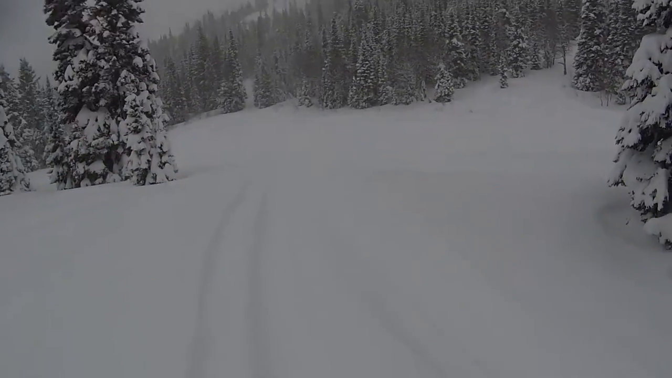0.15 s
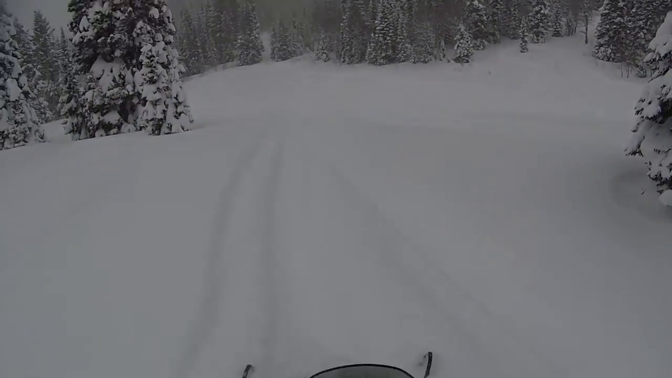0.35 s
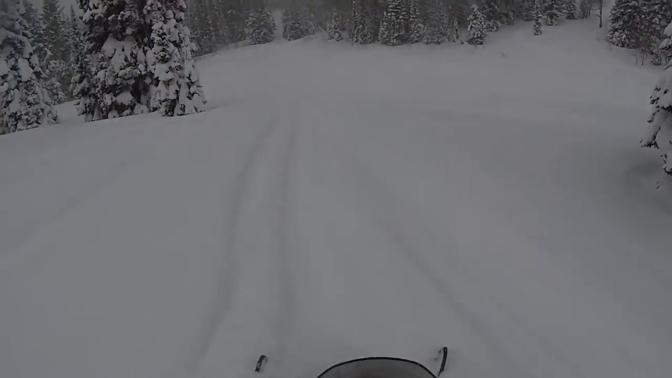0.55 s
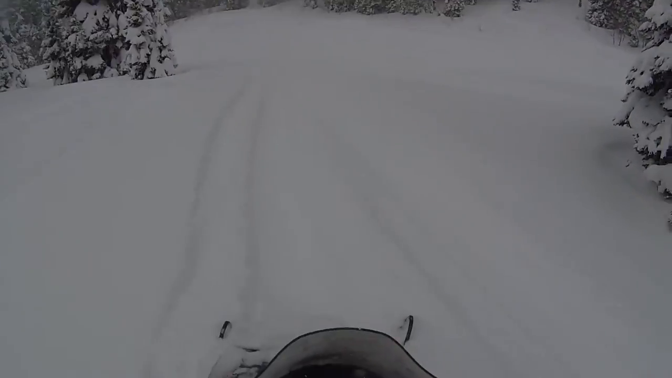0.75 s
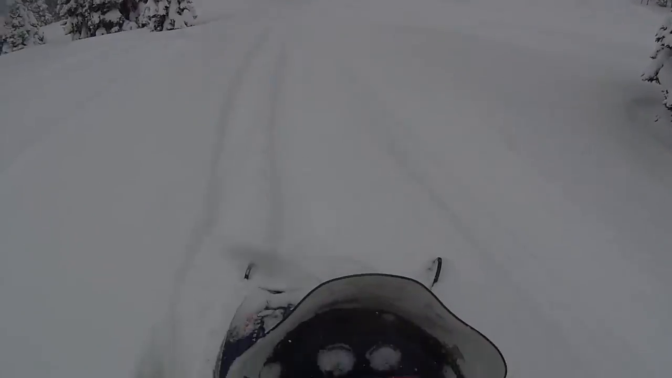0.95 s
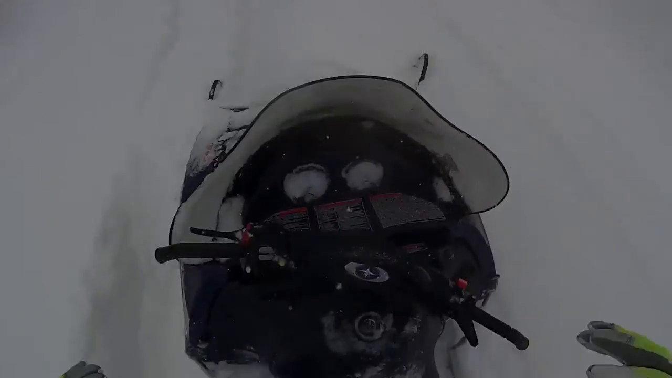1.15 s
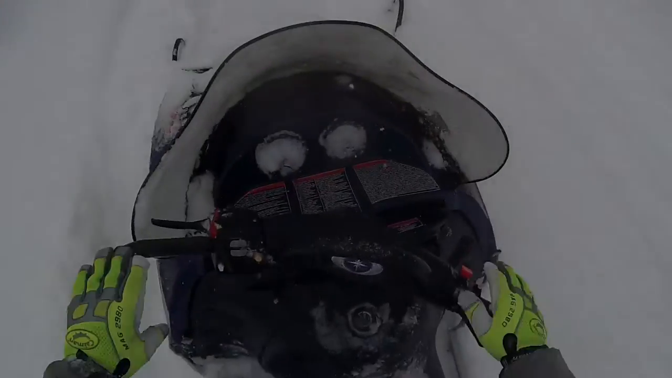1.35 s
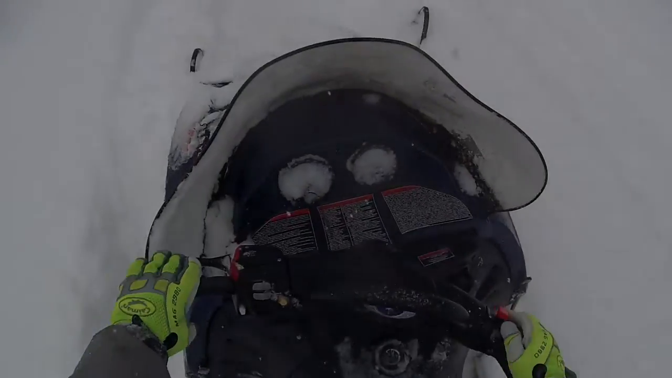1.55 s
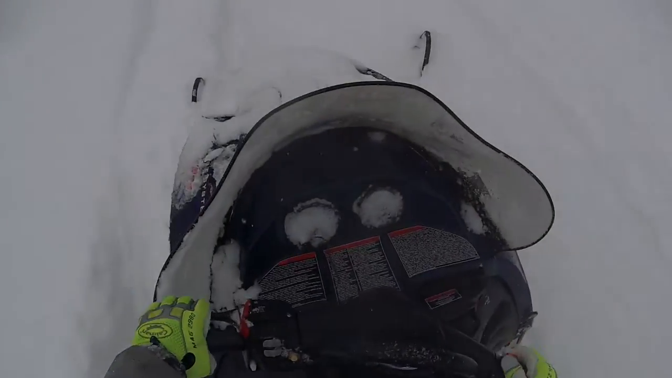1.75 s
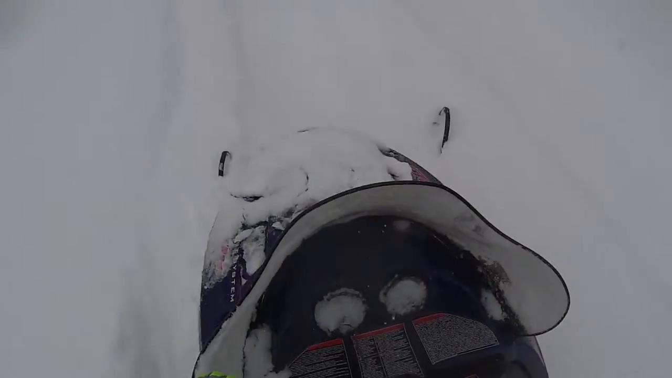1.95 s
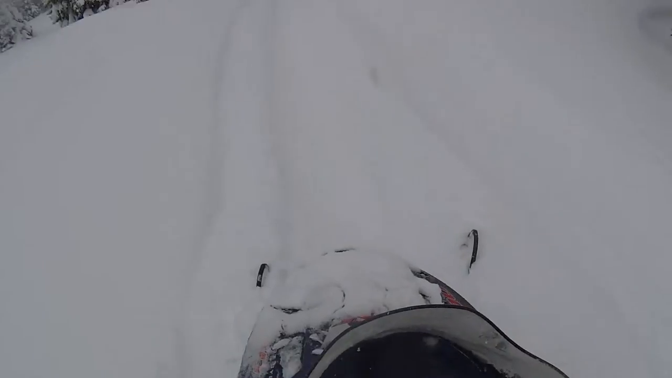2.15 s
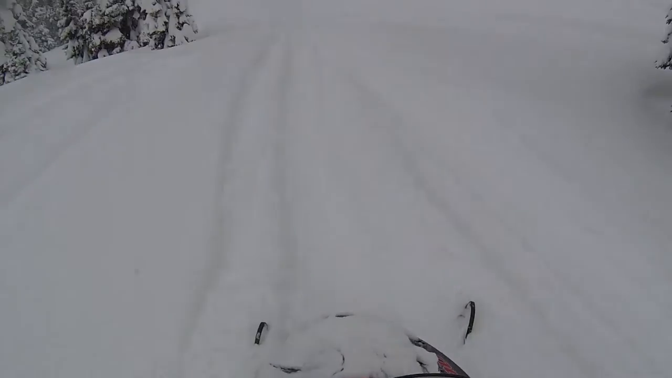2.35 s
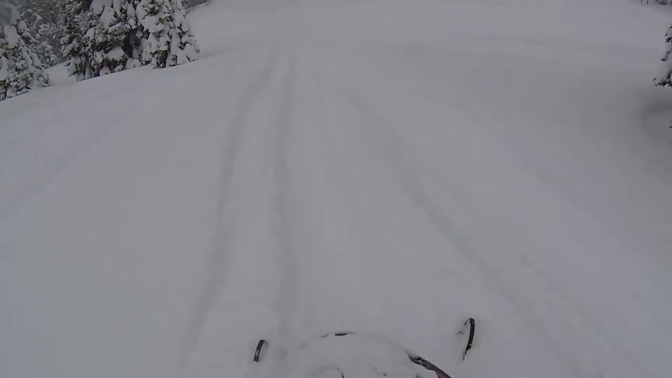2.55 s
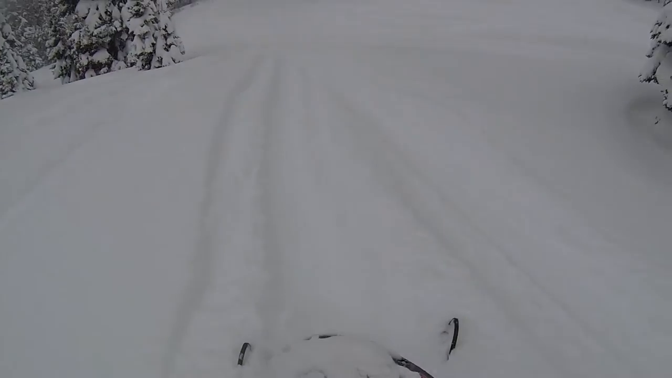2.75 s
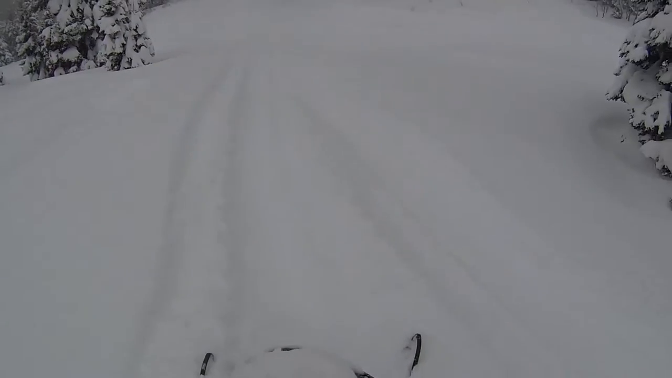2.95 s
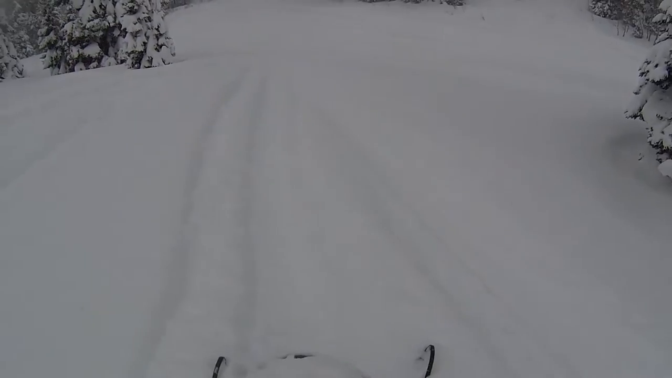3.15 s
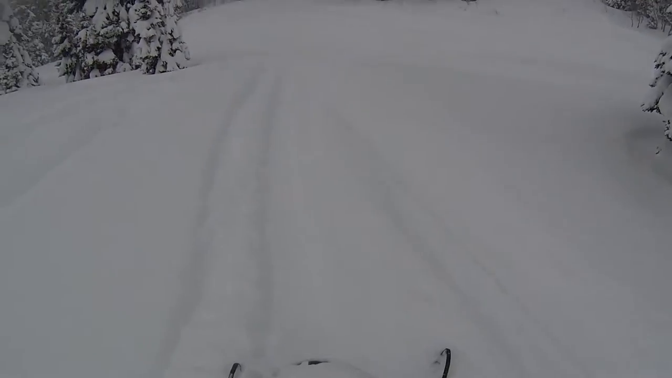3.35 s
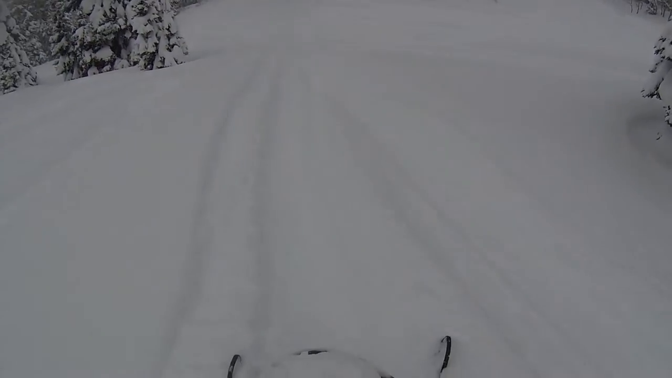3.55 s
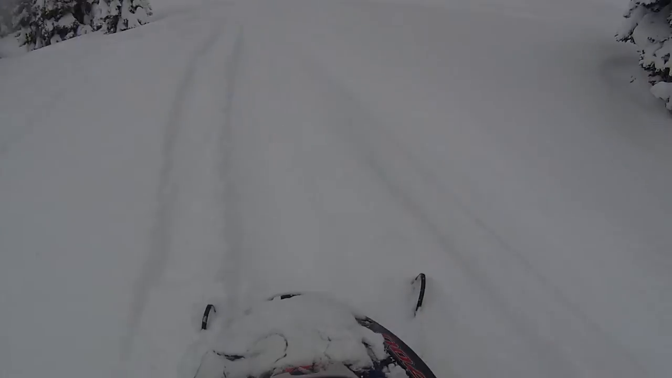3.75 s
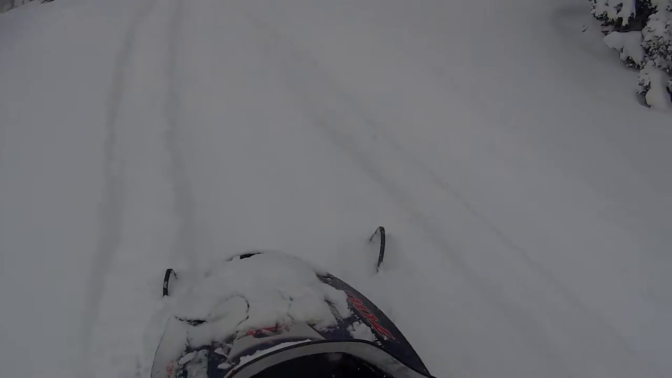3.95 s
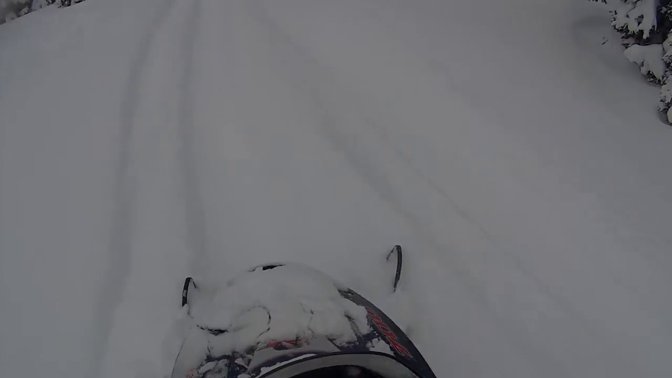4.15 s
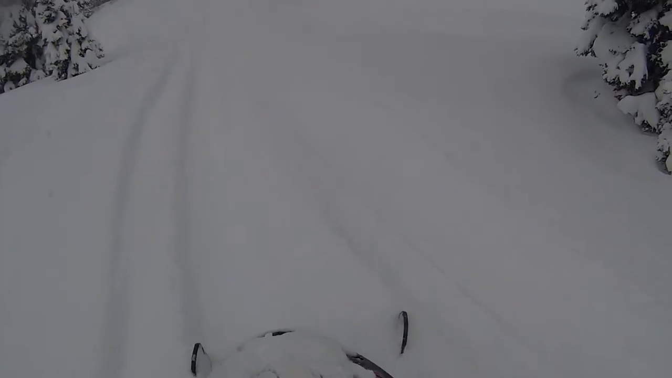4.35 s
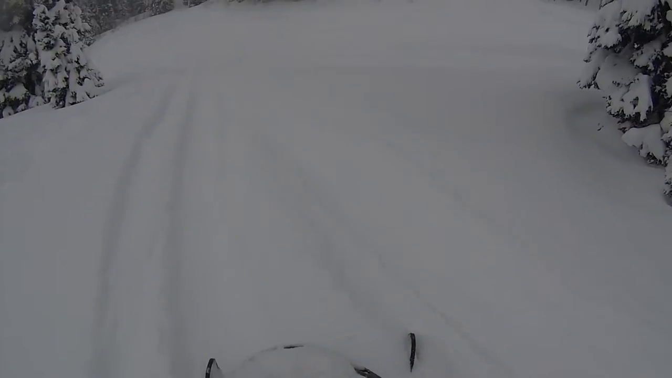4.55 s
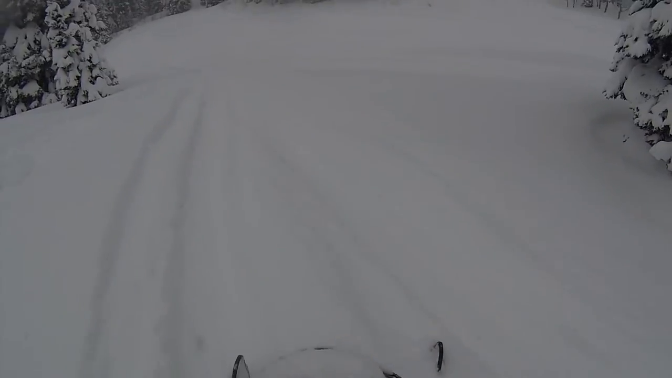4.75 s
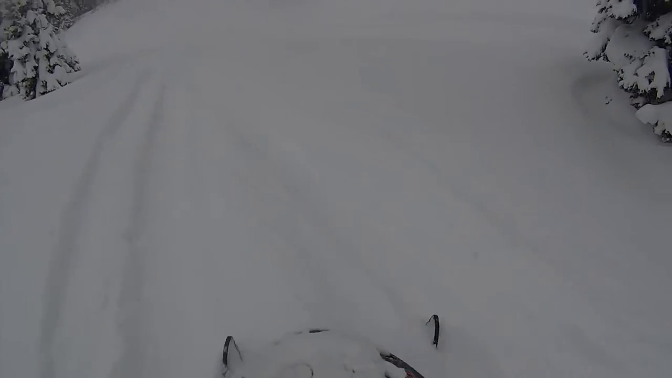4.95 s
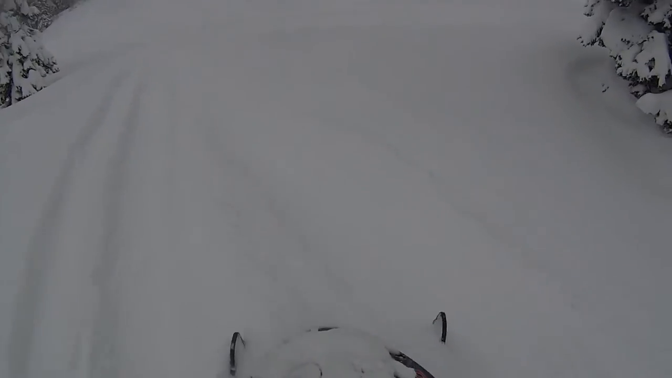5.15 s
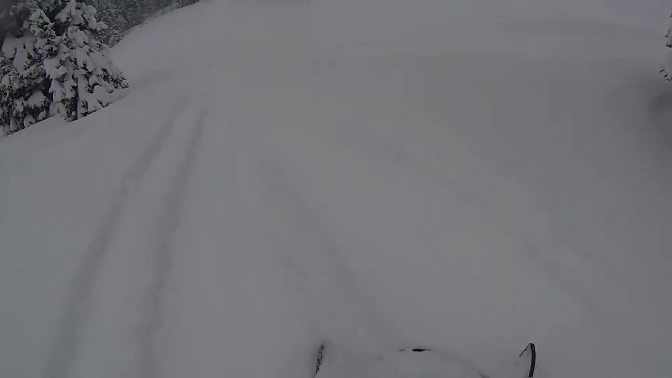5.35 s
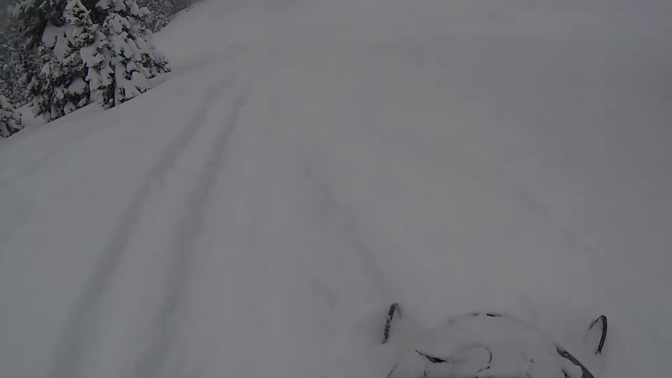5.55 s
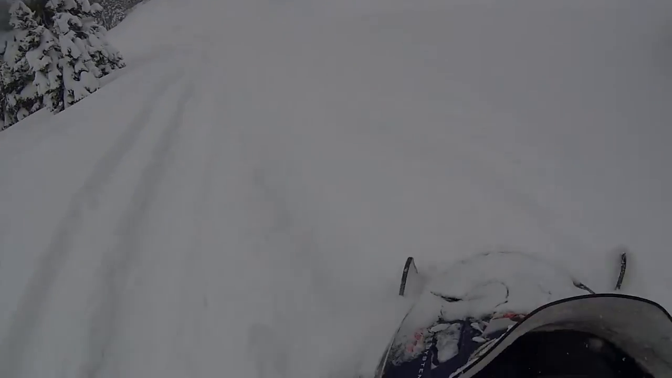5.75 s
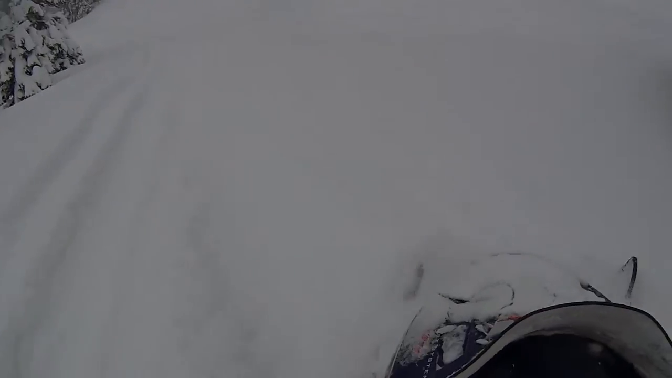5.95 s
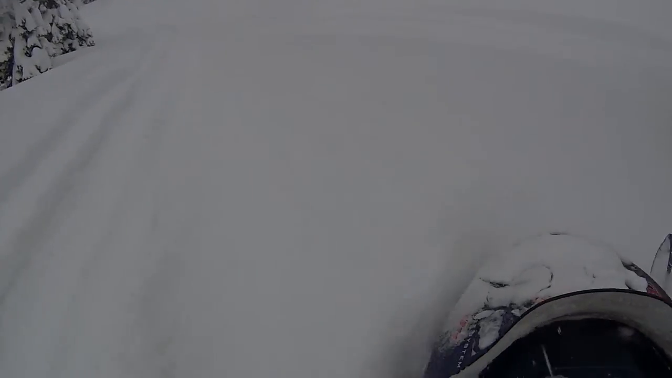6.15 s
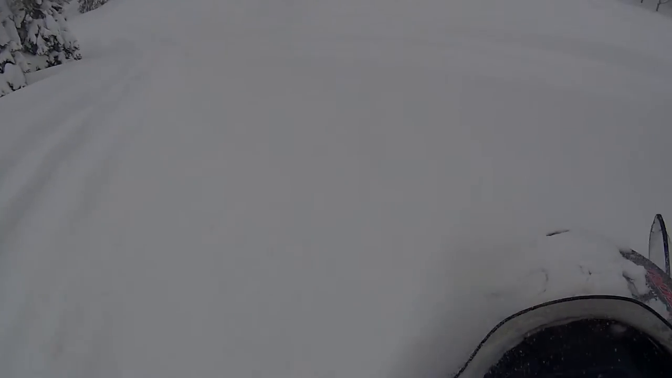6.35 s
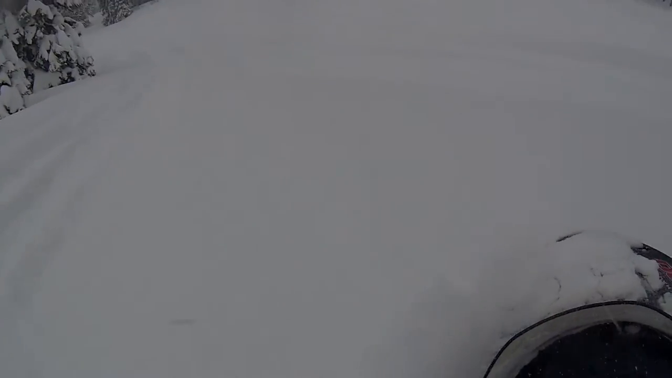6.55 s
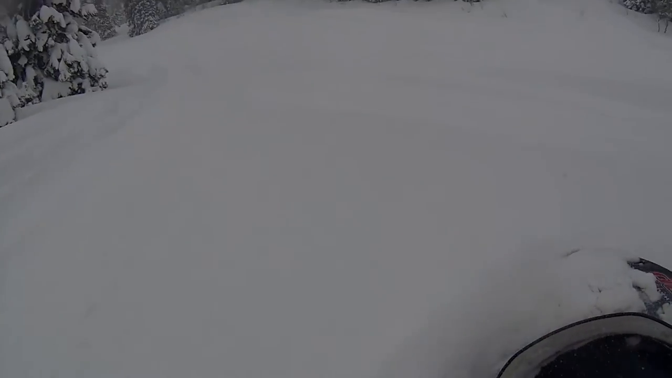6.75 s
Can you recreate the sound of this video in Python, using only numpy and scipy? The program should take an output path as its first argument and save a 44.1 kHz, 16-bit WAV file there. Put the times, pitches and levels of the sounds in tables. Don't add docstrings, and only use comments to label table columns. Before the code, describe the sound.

Heard from a sealed helmet camera outdoors in deep snow: for the first second, cloth scrapes, knocks and low wobbling thumps cover a quiet two-stroke idle. The engine putters alone with a few light taps, then revs at about two and a half seconds into rough, wavering blips. Near the end it surges upward, louder and smoother, into a ringing, nasal drone with airy hiss.

```python
import sys
import numpy as np
from scipy import signal
from scipy.fft import rfft, irfft
from scipy.io import wavfile
from scipy.ndimage import uniform_filter1d

SR = 44100
rng = np.random.default_rng(int(sys.argv[2]) if len(sys.argv) > 2 else 0)


def int16_out(signal):
    q = np.round(np.clip(np.atleast_2d(signal).T, -1, 1) * 32767)
    wavfile.write(sys.argv[1], SR, q.astype(np.int16))


def to_linear_factor(level_db):
    exponent = np.asarray(level_db, float) / 20
    return 10 ** exponent


N = 304290
T = np.arange(N) / SR


def evened(x):
    return x / np.sqrt(np.mean(x ** 2) + 1e-20)


def curves(rows):
    t_s, *columns = np.transpose(rows)
    return [np.interp(T, t_s, c) for c in columns]


def read(points, hz):
    f_hz, value = np.transpose(points)
    return np.interp(np.log(hz + 1), np.log(f_hz + 1), value)


def band(x, lo_hz, hi_hz):
    return signal.sosfilt(signal.butter(2, [lo_hz, hi_hz], "band", fs=SR, output="sos"), x)


def above(x, hz):
    return signal.sosfiltfilt(signal.butter(3, hz, "high", fs=SR, output="sos"), x)


def drift(hz):
    count = 8192
    f_hz = np.fft.rfftfreq(count, N / SR / count)
    slow = irfft(rfft(rng.standard_normal(count)) / (1 + (f_hz / hz) ** 2))
    return np.interp(T, np.linspace(0, T[-1], count), evened(slow))


def bursts(rows, rest_db, rise_db_s, fall_db_s):
    t = T[::40]
    each_db = []
    for start_s, hold_s, db in rows:
        rise_db = rise_db_s * np.maximum(start_s - t, 0)
        fall_db = fall_db_s * np.maximum(t - start_s - hold_s, 0)
        each_db.append(db - rise_db - fall_db)
    power = np.interp(T, t, to_linear_factor(2 * np.array(each_db)).sum(0))
    return 10 * np.log10(power + to_linear_factor(2 * rest_db))


def coloured(x, gain):
    log_gain = np.log(gain(abs(np.fft.fftfreq(8192, 1 / SR))) + 1e-7)
    taps = np.fft.ifft(np.exp(log_gain - 1j * signal.hilbert(log_gain).imag)).real[:4096]
    return signal.oaconvolve(x, taps / np.linalg.norm(taps))[:len(x)]


def case(x):
    # f/Hz, width/Hz, level/dB
    mode_rows = [(1397, 36, -8), (1475, 70.4, 1.5), (1600.5, 200, -4.5), (1847, 430, -15.5),
                 (2160, 190, -16.5), (2244, 57, -13), (2452, 480, -20.5), (3465, 370, -24),
                 (4600, 374, -28), (5050, 520, -46), (6770, 710, -37), (8500, 1500, -51.5),
                 (10700, 1300, -56.5)]
    # f/Hz, level/dB
    leak_rows = [(30, -24.5), (150, -7), (400, -44.5), (800, -21.5), (1050, -52), (3000, -31),
                 (7500, -48.5), (15000, -102)]

    def gain(hz):
        modes = sum(to_linear_factor(2 * db) / (1 + (2 * (hz - f) / w) ** 2) ** 2.15 for f, w, db in mode_rows)
        return np.sqrt(modes + to_linear_factor(2 * read(leak_rows, hz)))

    return coloured(x, gain)


def voiced(x, body_db, fizz_db):
    top = above(x, 2770)
    return to_linear_factor(body_db) * evened(x - top) + to_linear_factor(fizz_db) * evened(top)


def camera():
    # f/Hz, density/dB per Hz
    hiss_rows = [(100, 5.5), (300, -5), (700, -13), (1100, -12.5), (3000, -30.5), (7000, -32),
                 (11000, -32.5), (15000, -37.5)]
    # multiple of whine_hz, level/dB
    whine_rows = [(2, -85.5), (3, -77), (4, -81), (5, -100.5)]
    hiss_db, crackle_db, whine_hz = -62.5, -58.0, 2820
    hiss = coloured(rng.standard_normal(N), lambda hz: to_linear_factor(read(hiss_rows, hz)))
    hiss /= np.std(band(hiss, 213, 1054))
    sizes = to_linear_factor(5.2 * np.minimum(rng.exponential(1, N), 4) + 1.2 * drift(3))
    crackle = sizes * (rng.random(N) < 150 / SR) * np.interp(T, [.9, 1.1], [.3, 1])
    crackle = band(band(crackle, 10500, 14800), 10000, 15000)
    fade_db = np.interp(T, [.9, 1.2], [0, -6])
    whine = 0
    for k, db in whine_rows:
        whine = whine + to_linear_factor(db + fade_db + 3.2 * drift(40)) * np.cos(2 * np.pi * k * whine_hz * T)
    return to_linear_factor(hiss_db) * hiss + to_linear_factor(crackle_db) * crackle + whine


def order(crank, k, waver_db):
    phase = 2 * np.pi * (k * crank + rng.random())
    return np.sqrt(2) * to_linear_factor(waver_db * drift(3.3)) * np.cos(phase)


def low_orders(crank, climb_hz_s, clatter_db, tone_db):
    # crank order, level re firing tone/dB
    order_rows = [(1, -20.5), (3, -20.5), (5, -21.5), (7, -44), (8, -25)]
    second_db = -67 + 0.067 * (tone_db + 53) + 0.0455 * climb_hz_s
    third_db = -68
    low = to_linear_factor(tone_db) * order(crank, 2, 1)
    low += to_linear_factor(second_db) * order(crank, 4, 1.9) + to_linear_factor(third_db) * order(crank, 6, 1.5)
    others = sum(to_linear_factor(db) * order(crank, k, 2.2) for k, db in order_rows)
    return low + to_linear_factor(tone_db + 0.32 * (clatter_db - tone_db - 12.5)) * others


def upper_orders(crank):
    return sum(to_linear_factor(-.4 * (k - 7.5)) * order(crank, k, 3.2) for k in range(9, 35))


def exhaust_puffs(crank):
    shot = np.floor(2 * crank).astype(int)
    strength = to_linear_factor(0.76 * rng.standard_normal(shot[-1] + 1))[shot]
    gate = (1.7 + np.exp(-(2 * crank % 1) / 0.15)) * strength
    return evened(gate * to_linear_factor(0.65 * drift(45)) * rng.standard_normal(N))


def case_clatter(firing_hz, rough, upper, puffs):
    density = np.sqrt(firing_hz / SR)
    drive = np.sqrt(1 - rough) * density * upper + np.sqrt(rough) * puffs
    clatter = above(case(drive), 964)
    return clatter + (to_linear_factor(2.35 * rough * drift(40)) - 1) * band(clatter, 1330, 1550)


def exhaust_leak(upper, puffs, fizz_db):
    leak_db = 0.83 * (fizz_db + 53.5)
    wash = to_linear_factor(-62.5 + leak_db) * evened(band(puffs, 110, 860))
    resonance = band(upper, 616, 970) + 1.9 * band(upper, 824, 825)
    pipe = to_linear_factor(-69.0 + leak_db) * band(resonance, 550, 1200)
    air = to_linear_factor(-81.0 + 1.38 * (fizz_db + 49)) * evened(band(puffs, 9950, 13000))
    return wash + pipe + air


def intake_roar(firing_hz, upper, puffs):
    intake = np.roll(puffs, SR)
    roar_db = -71 + 35.5 * np.log2(firing_hz / 140)
    top = evened(band(intake, 3400, 5830))
    body = evened(band(band(intake + .02 * upper, 2090, 2650), 2080, 2500))
    return to_linear_factor(roar_db) * (top + 1.2 * body)


def body_panel(puffs):
    start_s, loose_s, settle_s, stop_s = 2.36, 3.33, 0.29, 5.4
    loose_db, settled_db = -46, -55
    level_db = loose_db + (settled_db - loose_db) * np.clip((T - loose_s) / settle_s, 0, 1)
    onset = np.clip((T - start_s) / 0.098, 0, 1)
    buzz = evened(band(band(puffs, 2050, 2180), 2024, 2160))
    return to_linear_factor(level_db) * onset * buzz * (T < stop_s)


def singing(crank):
    # start/s, end/s, crank order, level/dB
    song_rows = [(5.67, 6.523, 6, -48.5), (6.57, 7.2, 6, -48.5), (2.376, 2.54, 6, -64),
                 (5.68, 6.02, 15, -23), (5.841, 6.02, 13, -41), (5.749, 5.95, 17, -36),
                 (5.98, 6.454, 11, -47.5), (5.98, 6.34, 22, -41), (5.99, 6.304, 23, -45),
                 (6.08, 6.445, 19, -50), (6.351, 6.75, 13, -41), (6.549, 6.9, 16, -34),
                 (6.658, 7.05, 15, -26)]
    out = 0
    for a, b, k, db in song_rows:
        swell = np.sin(np.pi * np.clip((T - a) / (b - a), 0, 1)) ** 0.58
        tone = np.sqrt(2) * np.cos(2 * np.pi * round(k) * crank)
        out = out + to_linear_factor(db + 2.4 * drift(3.1)) * swell * tone
    return out


def lope(crank, climb_hz_s, rough):
    turn = np.floor(crank + .5).astype(int)
    scatter = uniform_filter1d(to_linear_factor(2.5 * rng.standard_normal(4000))[turn], size=100)
    depth = .05 + .002 * uniform_filter1d(climb_hz_s, size=4000)
    depth = np.clip((1 - rough) * depth * 2, 0, .45)
    swing = (1 + depth * np.cos(2 * np.pi * crank)) * (1 + depth * (scatter - 1))
    return swing / np.sqrt(1 + depth ** 2 / 2)


def engine():
    # t/s, firing f/Hz, clatter level/dB, throttle level/dB
    idle_rows = [(0, 56.2, -46.5, -52), (1.9, 57.5, -52, -52), (2.2, 72.9, -51, -46.5),
                 (2.355, 80, -51.5, -49), (2.385, 87.83, -43, -47), (2.55, 135, -37, -53.5),
                 (2.64, 131.4, -38.5, -87), (2.78, 124.7, -39.5, -55), (2.97, 136.9, -34.5, -59),
                 (3.14, 145.2, -36, -55.5), (3.43, 137.9, -37, -54), (3.65, 152.3, -33.5, -51.5),
                 (3.83, 138.7, -35, -53), (4.07, 164, -34, -50), (4.23, 135.2, -36, -62.5),
                 (4.46, 125.7, -37, -55.5), (4.8, 131.9, -37, -55.5), (5.33, 136.8, -35.5, -53.5)]
    # t/s, firing f/Hz, clatter level/dB, throttle level/dB
    pull_rows = [(5.4, 141.4, -32, -49.5), (5.578, 171.4, -25.5, -49), (5.692, 189.3, -19.5, -41.5),
                 (5.808, 201.7, -19, -39.5), (5.976, 224.8, -20.5, -37.5), (6.031, 230.3, -25.5, -34),
                 (6.113, 233.7, -24, -35), (6.371, 232.8, -22.5, -36), (6.761, 221.1, -22, -38),
                 (6.9, 217.8, -20, -37.5)]
    # firing f/Hz, noise share of clatter/0-1
    rough_rows = [(57, .95), (140, .88), (190, .36), (235, .33)]
    # t/s, hold/s, level re running fizz/dB
    fizz_burst_rows = [(2.375, .01, 2.5), (2.555, 0.025, 5.5), (2.97, 0.078, 2.5), (3.97, 0.031, 0.5),
                       (6.86, .05, -1.5)]
    firing_hz, clatter_db, tone_db = curves(idle_rows + pull_rows)
    firing_hz = uniform_filter1d(firing_hz, size=2000)
    climb_hz_s = np.maximum(np.gradient(firing_hz) * SR, 0)
    crank = np.cumsum(firing_hz / 2) / SR
    rough = np.interp(firing_hz, *np.transpose(rough_rows))

    fizz_cap_db = -25
    fizz_db = -55.5 + 0.67 * (np.minimum(clatter_db, fizz_cap_db) + 35.5)
    fizz_db += 12.5 * np.log2(np.maximum(firing_hz / 140, 1))
    fizz_db += drift(8) + bursts(fizz_burst_rows, 0, 400, 150)

    upper, puffs = upper_orders(crank), exhaust_puffs(crank)
    clatter = case_clatter(firing_hz, rough, upper, puffs)
    body = voiced(clatter, clatter_db - 2.71 * (1 - rough), fizz_db) + singing(crank)
    body = body + (lope(crank, climb_hz_s, rough) - 1) * band(body, 1380, 1900)
    low = low_orders(crank, climb_hz_s, clatter_db, tone_db)
    leak = exhaust_leak(upper, puffs, fizz_db)
    return low + body + leak + intake_roar(firing_hz, upper, puffs) + body_panel(puffs)


def shake():
    # t/s, hold/s, level/dB
    jolt_rows = [(0.0, 0.15, -32), (.15, 0.092, -21.5), (.37, 0.047, -20.5), (.52, 0.205, -30),
                 (.75, .01, -27.5), (.82, 0.037, -18), (.9, 0.13, -32), (1.59, .01, -49), (1.86, .01, -41),
                 (2.19, .01, -43.5), (2.44, 0.0089, -38), (3.17, 0.055, -46), (3.48, 0.095, -37),
                 (3.8, 0.009, -50), (3.98, 0.0095, -43), (4.23, 0.04, -47), (4.86, .01, -51),
                 (5.01, 0.06, -44.5), (5.25, 0.19, -43.5), (5.63, 0.16, -40.5), (5.95, 0.082, -36.5),
                 (6.17, 0.028, -38.5), (6.32, .18, -40), (6.59, .03, -43), (6.75, 0.045, -36)]
    # t/s, hold/s, level/dB
    gust_rows = [(.08, 0.013, -28.5), (.3, 0.024, -42), (.55, 0.16, -46), (.79, 0.036, -34.5),
                 (.9, .01, -44), (1.81, 0.0088, -59), (2.19, .01, -58), (2.36, 0.096, -56),
                 (3.48, 0.007, -38), (3.79, 0.021, -40), (4.1, .01, -66), (4.31, .02, -43), (4.6, .04, -43),
                 (4.85, .03, -42.5), (5.2, 0.058, -42.5), (5.74, .03, -62), (5.96, .02, -63),
                 (6.32, 0.011, -49), (6.65, 0.011, -49)]
    rest_db, calm_db, mount_hz = -51.5, -60, 42
    wobble_db = bursts(jolt_rows, rest_db + 2.9 * drift(6.0), 450, 250)
    wind_db = bursts(gust_rows, calm_db + 5.4 * drift(6.0), 300, 240)
    swing = np.cos(2 * np.pi * np.cumsum(mount_hz * (1 + 0.0394 * drift(3.8))) / SR)
    sway = evened(band(band(rng.standard_normal(N), 11.4, 50), 4.5, 53.6))
    buffet = evened(band(band(rng.standard_normal(N), 55, 99.0), 60, 100))
    wobble = evened(swing + (0.27 + .5 * (T > 1.1)) * sway)
    return to_linear_factor(wobble_db) * wobble + to_linear_factor(wind_db - 2.0) * buffet


def rub():
    # t/s, hold/s, level/dB, fizz level re stroke/dB
    stroke_rows = [(0.0, 0.035, -34.5, -31), (0.061, 0.055, -32, -12), (0.208, 0.067, -37, -18),
                   (0.344, 0.054, -40.5, -14.5), (0.481, 0.099, -38, -11.5), (0.623, 0.097, -39.5, -17),
                   (0.813, 0.032, -38, -19), (0.898, 0.0026, -39, -24)]
    rest_db, slips_per_s = -54, 1500
    body_db = bursts([row[:3] for row in stroke_rows], rest_db, 720, 600)
    fizz_rows = [(s, hold, db + fizz) for s, hold, db, fizz in stroke_rows]
    fizz_db = bursts(fizz_rows, rest_db - 26, 840, 800)
    slips = to_linear_factor(2.0 * np.minimum(rng.exponential(1, N), 4)) * rng.standard_normal(N)
    slips *= rng.random(N) < slips_per_s / SR
    drag = to_linear_factor(2.1 * drift(49)) * evened(evened(slips) + 0.76 * rng.standard_normal(N))
    scrape = case(drag + 1.23 * band(drag, 1890, 2900) + 1.3 * band(drag, 4770, 5260))
    hollow = evened(band(drag, 60, 255)) + 0.7 * evened(band(drag, 452, 514))
    hollow += 0.36 * evened(band(drag, 680, 717)) + 1.3 * evened(band(drag, 1215, 1400))
    release = np.clip((.97 - T) / 0.043, 0, 1)
    return (voiced(scrape, body_db - 2.0, fizz_db) + to_linear_factor(body_db - 16.5) * hollow) * release


def knocks():
    # t/s, peak level/dB, then upper ring, tick, thud level re peak/dB
    knock_rows = [(0.021, -27, -12, -27, -16), (0.0561, -21.5, 2.5, -28, -24),
                  (0.0746, -27, -17, -7.5, -7.5), (0.205, -32, -25, -20, -17), (0.2657, -34, 7, -23, -26),
                  (0.394, -42.5, -7, -0.5, -13), (0.4918, -30, 1, -11, -30), (0.5815, -27.5, -23, -29, -22),
                  (0.626, -37, 8, -2, -6), (0.7906, -34, 4, -14, -10), (0.8096, -20, -5.5, -18, -18),
                  (0.819, -38, -10, 1, -20), (0.8367, -34, -19, -0.5, -12), (0.8907, -18.5, -4, -20.5, -23),
                  (0.9218, -37, -28, -27, -33), (1.283, -20.5, -5, -36, -24), (1.424, -40, -10, -15, -31),
                  (1.9032, -33.5, -8, -41, -20), (2.0414, -39, -13, -20, -34),
                  (2.1565, -35.5, -4, -11, -37), (2.3645, -35.5, -4, -14, -43),
                  (5.1656, -23.5, -5, -28, -26)]
    tick_hz = 3290
    t, out = np.arange(3000) / SR, np.zeros(N + 3000)
    press = (1 - np.exp(-(t / 0.00093) ** 2)) * (0.34 + np.exp(-(t / 0.006) ** 4))

    def ring(hz, t60_s):
        tone = np.sin(2 * np.pi * (hz * rng.uniform(0.95, 1.02) * t))
        return tone * to_linear_factor(-60 * t / t60_s) * press

    for start_s, peak_db, upper_db, tick_db, thud_db in knock_rows:
        main = .5 * ring(1780, 0.011) + ring(1578, 0.07)
        upper = ring(2140, 0.021) + .5 * ring(2460, 0.034)
        tick = ring(tick_hz, 0.025) + ring(1.12 * tick_hz, 0.049)
        tick += 0.4 * ring(5330, 0.016) + 0.41 * ring(6700, 0.014)
        thud = ring(481, 0.25)
        start = round(start_s * SR)
        for db, part in [(0, main), (upper_db, upper), (tick_db, tick), (thud_db, thud)]:
            out[start:start + len(t)] += to_linear_factor(peak_db + db) * part / abs(part).max()
    return out[:N]


def surges():
    # t/s, peak level/dB
    surge_rows = [(2.7063, -22), (3.409, -22), (3.7684, -19.5), (3.8736, -36), (3.992, -21.5),
                  (4.0762, -21), (5.114, -42), (5.61, -22), (5.674, -25), (5.686, -22), (5.735, -12),
                  (5.785, -15), (5.8635, -11.5), (6.543, -16)]
    t, out = np.arange(900) / SR, np.zeros(N + 900)
    swell = (1 - np.exp(-(t / 0.0033) ** 2)) * np.exp(-(t / 0.015) ** 2)
    for start_s, db in surge_rows:
        modes = np.sin(2 * np.pi * 1475 * t)
        modes += 0.21 * np.sin(2 * np.pi * 1610 * t + 6 * rng.random())
        start = round(start_s * SR)
        out[start:start + len(t)] += to_linear_factor(db - 4.5) * modes * swell
    return out[:N]


def belt():
    # t/s, f/Hz, level/dB
    belt_rows = [
        (5.5, 55.16, -85),
        (5.65, 80.1, -44),
        (5.9, 134.6, -47),
        (6.15, 185.8, -49.5),
        (6.4, 202.7, -45.5),
        (6.9, 197.7, -49),
    ]
    hz, db = curves(belt_rows)
    phase = 2 * np.pi * np.cumsum(hz * (1 + 0.022 * drift(8.2))) / SR
    return to_linear_factor(db + 1.7 * drift(1.7)) * np.cos(phase)


def scene():
    return (camera() + engine() + shake() + rub() + knocks() + surges() + belt())[None]


def roll_off(x):
    return signal.sosfilt(signal.butter(12, 15270, fs=SR, output="sos"), x)


def record(dry):
    return roll_off(dry)


dry = scene()
out = record(dry)
int16_out(out)
```